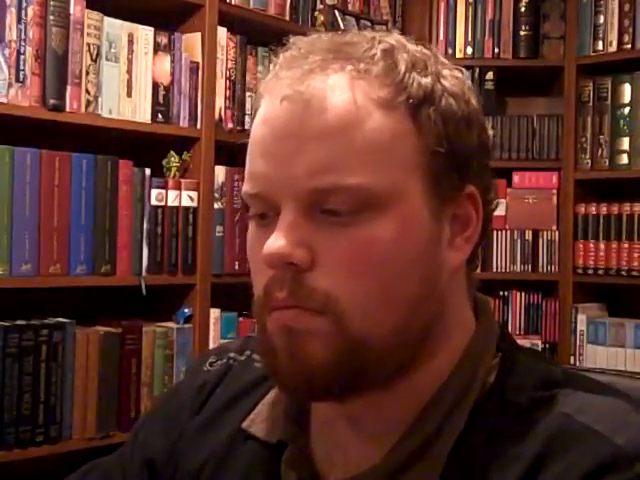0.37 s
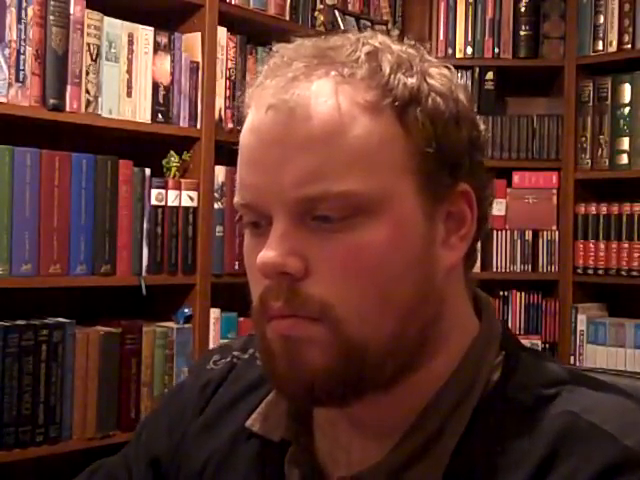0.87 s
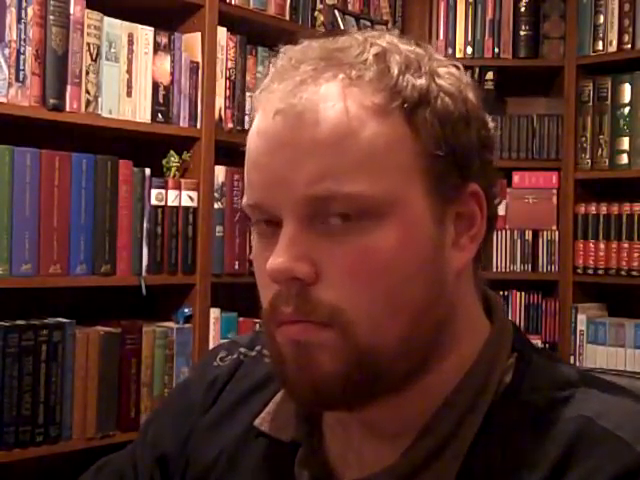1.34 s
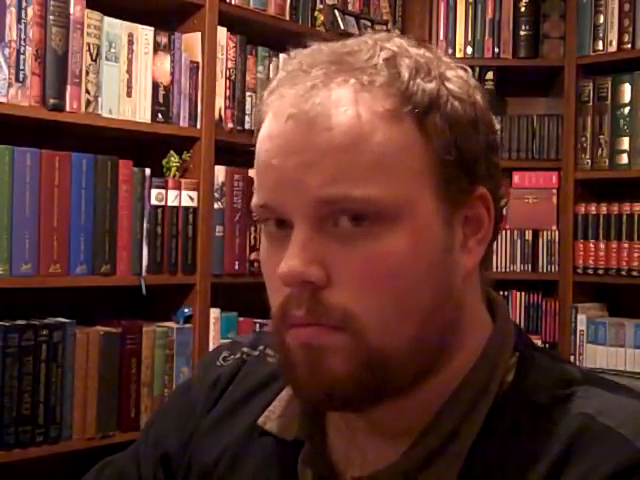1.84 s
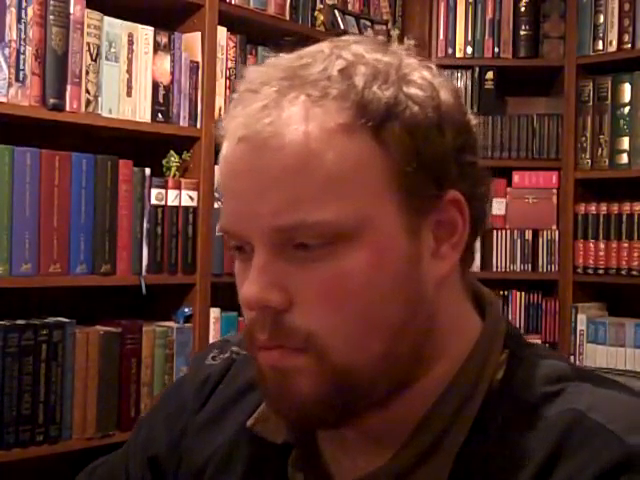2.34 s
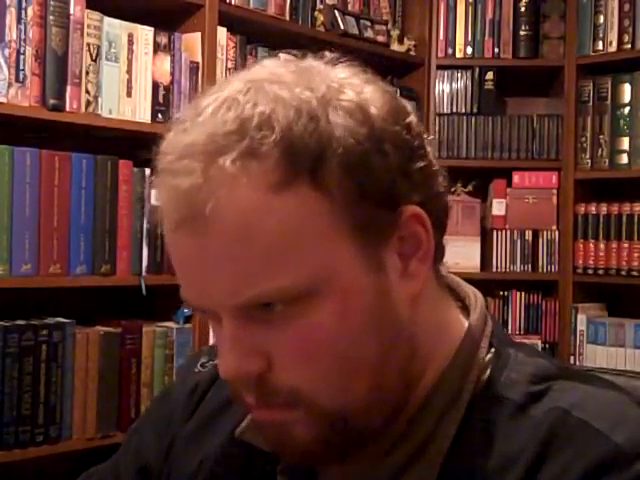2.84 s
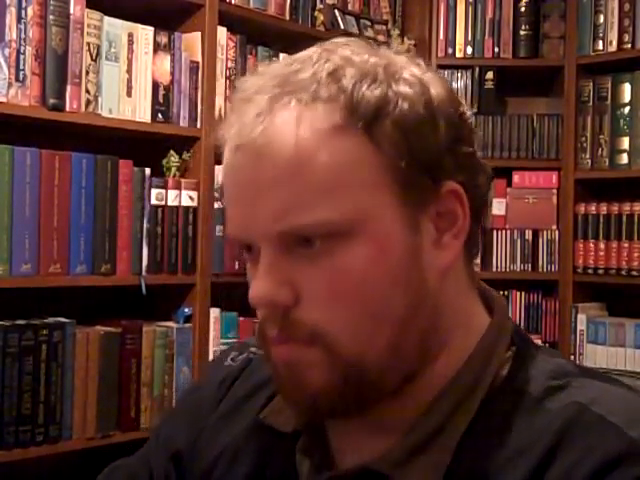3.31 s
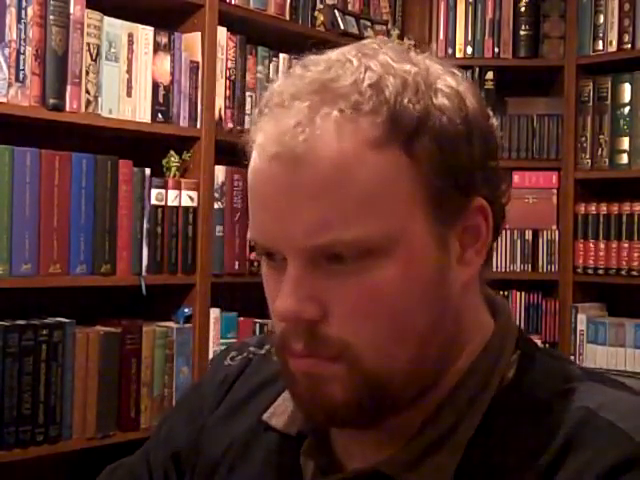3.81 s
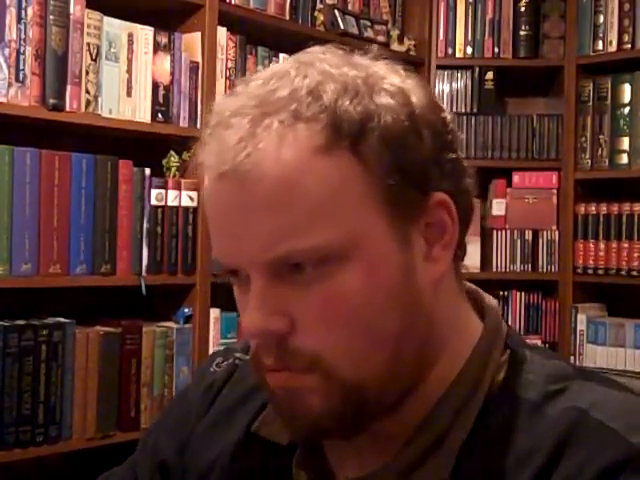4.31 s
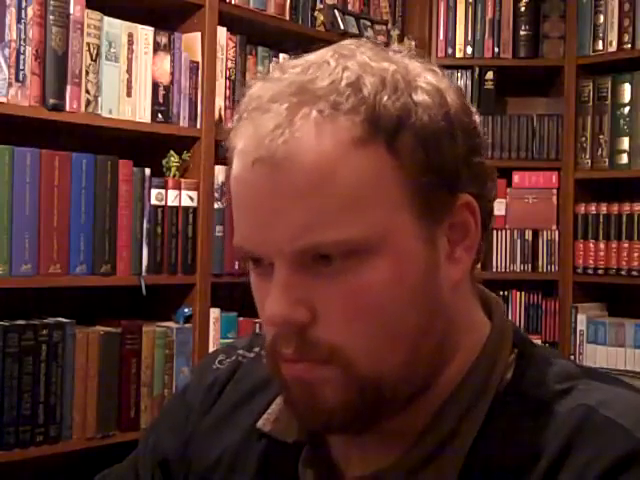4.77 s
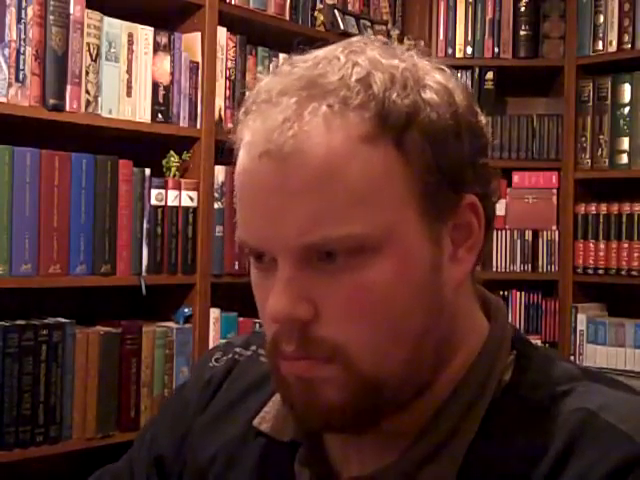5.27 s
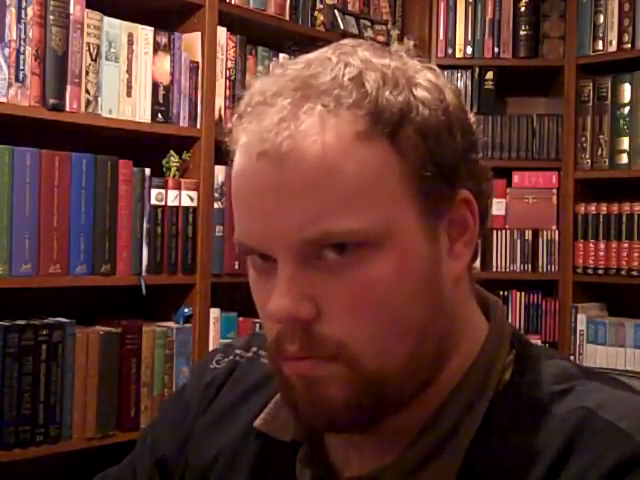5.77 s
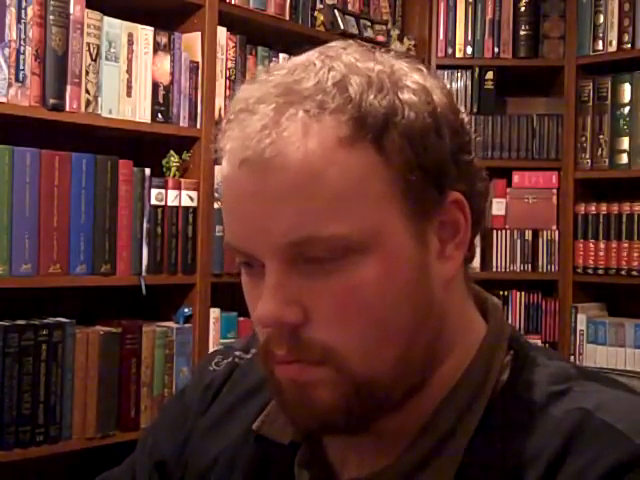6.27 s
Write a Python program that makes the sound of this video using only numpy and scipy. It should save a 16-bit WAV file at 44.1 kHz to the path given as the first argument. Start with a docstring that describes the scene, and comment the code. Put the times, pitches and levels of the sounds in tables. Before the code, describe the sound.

Fast, uneven typing on a plastic computer keyboard, crisp clicks and rattles over soft desk thumps, close up in a quiet book-lined room.

```python
"""Fast, uneven typing on a plastic keyboard in a small room lined with books; a little stereo microphone
lies close by on the same desk. Switches and caps click and rattle in shaped noise bursts.
Keys that bottom out ring modes of the case and the desk; books soak up the echo's treble first.
A quiet hum and hiss lie under it. Each microphone sits behind a small port, a resonant low-pass
that rings in the treble, the left one higher than the right."""
import sys
import numpy as np
from scipy import signal
from scipy.fft import rfft, irfft
from scipy.io import wavfile
from scipy.ndimage import uniform_filter1d

SR = 44100
rng = np.random.default_rng(int(sys.argv[2]) if len(sys.argv) > 2 else 0)


def invert_db(x):
    """Field ratio 10**(x/20) for x, a level in decibels (scalar or array-like)."""
    u = np.asarray(x, float) / 20
    return 10 ** u


def digitize_waveform(pressure):
    """Quantize a signal to 16-bit integers and store it at the path in sys.argv[1].

    Rows of a 2-D input are taken as channels; values are limited to [-1, 1].
    """
    field = np.atleast_2d(pressure).T
    bounded = np.clip(field, -1, 1)
    quanta = np.round(bounded * 32767).astype(np.int16)
    wavfile.write(sys.argv[1], SR, quanta)


N = 292367
TIME = np.arange(N) / SR

# Levels in the event tables are relative; the gains below set the final strength.
# clicks of switch, stem and cap: start_s [s], level_db [dB], cap_tone_db [dB against the click]
KEY_CLICKS = [(0.1598, -22, -13), (0.1957, -21.5, -15), (0.276, -22, -11), (0.2996, -25, -18),
              (0.369, -28, -16), (0.397, -17.5, -10), (0.41, -17.5, -8.5), (0.4936, -17.5, -12.5),
              (0.5599, -21, -11), (0.566, -23.5, -4), (0.5996, -25, -17), (0.743, -14, -14),
              (0.7833, -19.5, -15), (0.855, -36, -6), (0.8726, -17.5, -13), (0.9173, -28, 1),
              (1.054, -23, -10.5), (1.163, -10, -19), (1.186, -14, -12.5), (1.269, -23, -16),
              (1.3194, -19, -17), (1.4634, -18, -17), (1.5392, -17.5, -20), (1.6497, -20.5, -16.5),
              (1.664, -25, -23), (1.7401, -20.5, -11), (1.8859, -18, -27), (1.929, -27.5, -13),
              (2.0096, -26.5, -10), (2.044, -42, -3.5), (2.171, -22, -11), (2.357, -42, 1),
              (2.4029, -16, -16), (2.5444, -20, -11), (2.6166, -27, -5.5), (2.7206, -23.5, -18),
              (2.764, -35, -19), (2.784, -43, 7), (2.8626, -24, -10.5), (2.9054, -19, -6.5),
              (3.026, -35.5, -5), (3.0701, -17.5, -14.5), (3.1996, -23.5, -10), (3.2474, -20.5, -11.5),
              (3.319, -31.5, -6), (3.3399, -13, -14.5), (3.3758, -12.5, -15.5), (3.571, -27, -15),
              (3.6896, -23, -14), (3.7454, -15.5, -14.5), (3.8825, -16.5, -12), (3.904, -17, -28),
              (3.956, -20.5, -14.5), (4.0015, -14, -17.5), (4.092, -12.5, -8), (4.232, -21.5, -12.5),
              (4.2828, -20, -15), (4.316, -16.5, -14.5), (4.4217, -28.5, -4), (4.4759, -16.5, -14),
              (4.5193, -23.5, -12), (4.6167, -18, -17), (4.6437, -23, -11), (4.6912, -14.5, -17.5),
              (4.758, -35.5, 2.5), (4.8022, -16.5, -11), (4.9326, -19.5, -13), (5.0223, -27.5, -13),
              (5.102, -39, -6), (5.1704, -17.5, -10.5), (5.2044, -28, -12), (5.308, -22, -6),
              (5.3268, -12, -11.5), (5.396, -18.5, -5), (5.438, -25.5, -6.5), (5.473, -26, -15),
              (5.5643, -16, -10), (5.6148, -16.5, -10), (5.683, -20, -14), (5.705, -22, -11),
              (5.833, -18, -15), (5.8958, -34, -20), (5.9254, -19.5, -21), (5.9906, -23.5, -16.5),
              (6.3946, -24.5, -12.5), (6.548, -25.5, -13.5), (6.5885, -21, -18)]
# further, thinner clicks with a common weak cap tone, some landing just after another click: start_s [s],
# level_db [dB]
THIN_CLICKS = [(0.0605, -21.5), (0.0767, -19), (0.096, -27), (0.103, -33), (0.331, -32), (0.338, -24.5),
               (0.376, -30), (0.418, -30), (0.5195, -20.5), (0.624, -18), (0.6332, -23), (0.756, -23),
               (0.765, -21), (0.8033, -25), (0.878, -23), (0.9713, -19), (0.9783, -36), (1.021, -33),
               (1.0703, -15), (1.083, -18.5), (1.1354, -18), (1.286, -53), (1.3439, -13), (1.3549, -22),
               (1.4338, -18.5), (1.6078, -24), (1.6266, -16.5), (1.7, -17.5), (1.793, -22.5), (1.8892, -26),
               (1.9524, -18), (2.128, -39), (2.1663, -23.5), (2.19, -25), (2.201, -24.5), (2.214, -46),
               (2.264, -37), (2.2805, -20), (2.3006, -24), (2.3045, -19), (2.395, -15.5), (2.426, -26),
               (2.4302, -15), (2.437, -28), (2.4394, -24.5), (2.599, -17), (2.737, -33), (2.929, -17.5),
               (3.126, -20.5), (3.22, -17), (3.234, -17), (3.2549, -11), (3.2615, -23), (3.269, -40),
               (3.348, -25), (3.37, -35), (3.431, -27.5), (3.4395, -42), (3.532, -22.5), (3.5985, -18.5),
               (3.6576, -16), (3.887, -31), (3.9125, -17), (4.0086, -19), (4.059, -19.5), (4.151, -27),
               (4.2544, -19.5), (4.3206, -29), (4.3509, -18.5), (4.418, -28), (4.492, -23.5), (4.532, -31),
               (4.5646, -17.5), (4.62, -17), (4.7128, -21), (4.7219, -38), (4.8112, -23), (4.9367, -22),
               (4.956, -23), (4.9633, -22), (4.9704, -19), (4.981, -20), (5.233, -19.5), (5.2406, -25),
               (5.3161, -25), (5.4438, -27.5), (5.4772, -25), (5.4902, -15.5), (5.557, -26), (5.572, -26.5),
               (5.609, -23), (5.6227, -45), (5.734, -21.5), (5.743, -19), (5.821, -32), (5.83, -18),
               (5.8796, -34), (6.0196, -19.5), (6.0852, -29), (6.0907, -33.5), (6.1995, -20), (6.239, -30),
               (6.3145, -20), (6.3216, -22.5), (6.4902, -21), (6.5143, -19)]
# wide, loosely guided keys that clatter on after the stroke: start_s [s], level_db [dB]
LOOSE_CLATTERS = [(.301, -89.5), (0.787, -88), (0.853, -92), (1.264, -90), (1.885, -91), (4.419, -90)]
# keys that hit bottom: start_s [s], knock_db [dB], thump_db [dB], pitch_hz [Hz, favoured by the case there]
KEY_BOTTOMS = [(0.093, -48, -58, 720), (0.195, -44.5, -53, 624), (0.407, -40, -43, 610),
               (0.493, -49, -49, 635), (0.564, -52, -68, 824), (0.623, -33.5, -39.5, 555),
               (0.749, -56, -46, 1100), (0.782, -47, -39, 720), (0.912, -62, -45.5, 503),
               (1.016, -39, -43.5, 444), (1.071, -35.5, -43.5, 495), (1.166, -32.5, -38.5, 430),
               (1.348, -42, -38, 690), (1.463, -37.5, -43.5, 505), (1.538, -61, -52, 910),
               (1.631, -50, -42.5, 704), (1.741, -32.5, -44, 464), (1.904, -47, -45.5, 440),
               (2.009, -37, -53, 450), (2.279, -36.5, -44.5, 452), (2.395, -53, -52, 875),
               (2.538, -59, -49, 806), (2.925, -50.5, -44, 760), (3.069, -58, -44.5, 795),
               (3.158, -58, -48.5, 720), (3.256, -30, -44.5, 388), (3.341, -34, -49, 447),
               (3.368, -56, -43.5, 860), (3.498, -48, -47, 452), (3.744, -38.5, -58, 436),
               (3.902, -30.5, -42, 450), (4.002, -25.5, -39, 398), (4.054, -38, -47, 494),
               (4.092, -40, -44.5, 458), (4.286, -38.5, -40.5, 588), (4.476, -41, -51, 452),
               (4.565, -53, -48, 615), (4.62, -42, -46, 506), (4.697, -37, -40, 473),
               (4.802, -38, -43, 470), (4.966, -44, -45, 610), (5.171, -59, -56, 925),
               (5.201, -50, -46.5, 382), (5.309, -36, -43, 450), (5.397, -57, -51, 830),
               (5.487, -40.5, -48.5, 431), (5.563, -34.5, -41.5, 470), (5.611, -37, -41.5, 409),
               (5.666, -55, -44.5, 786), (5.736, -52, -44, 755), (5.829, -53, -43, 447),
               (5.925, -45, -49.5, 483), (6.021, -57, -65, 860), (6.142, -52.5, -56, 610),
               (6.515, -56.5, -62, 850)]
# modes of the desk top: pitch_hz [Hz], level_db [dB], t60_s [s]
DESK_MODES = [(134.5, 3, 0.14), (153.2, 2.5, 0.086), (202.4, -12.5, 0.12), (303.2, -7, 0.093)]
# modes of the keyboard case: pitch_hz [Hz], level_db [dB], t60_s [s]
CASE_MODES = [(464.4, -1, 0.047), (563, 3, 0.037), (639, 2, 0.07), (841, 10.5, 0.08), (1050, 20, 0.04)]
# colour of the hard plastic snap ahead of the microphones: pitch_hz [Hz], level_db [dB]
SNAP_COLOUR = [(600, -3.5), (2500, -11.5), (4500, -3), (6000, -0.5), (10000, -4), (14200, -4.5),
               (16500, -45)]
# colour of the mid-band cap tone ahead of the microphones: pitch_hz [Hz], level_db [dB]
CAP_COLOUR = [(150, -26.5), (500, -6.5), (1500, -11.5), (2300, -2), (3300, -1), (6000, -22)]
# colour of the room air: pitch_hz [Hz], level_db [dB per Hz, relative]
AIR_COLOUR = [(30, -5), (85, 2.5), (135, 7.5), (300, -6.5), (850, -5), (1600, -12), (4000, -20.5),
              (13500, -55)]
# microphone ports, left then right: pitch_hz [Hz], sharpness [Q], level_db [dB], top_hz [Hz, roll-off]
MIC_PORTS = [(7693, 4.25, 0.5, 810000), (6416, 7.8, 0.5, 11570)]

AIR_DB, HUM_DB = -57.5, [-67, -59.5]  # rms ahead of the microphones; hum left, right
HUM_HZ, HUM_WIDTH_HZ = 50.5, 8.4
BRUSH_DB, PREAMP_HISS_DB = -62, -64
LEFT_LAG_S = 0.00002
ROOM_T60_S, ROOM_TREBLE_T60_S, ROOM_DB = 0.24, 0.099, -3.5

SNAP_GAIN_DB, CAP_GAIN_DB = 3, 11
TICK_CAP_DB = -23  # cap tone against a tick, in the place of cap_tone_db
TINT_DB = 3  # rms unevenness of a crack's own resonances
BOUNCE_S, BOUNCE_DB, BOUNCE_SCATTER_DB = 0.0066, -10, 4.5
TWIN_S, TWIN_DB, TWIN_SCATTER_DB = 0.0021, -7, 3.5

# rattle drive at a middling click or thump, and its growth in dB per dB
MID_CLICK_DB, RATTLE_DB, RATTLE_SLOPE = -22, -88, 0.6
MID_THUMP_DB, JOLT_DB, JOLT_SLOPE = -45, -100, 0.81
JOLT_RISE_S, JOLT_FADE_S = 0.012, 0.012

THUMP_GAIN_DB, KNOCK_GAIN_DB = 6, 4.5
THUMP_LAG_S = 0.00602  # the desk answers a moment after the case
KNOCK_FALL_DB = 34  # loss per octave away from the favoured pitch


def colour(x, points):
    """Causal filter with the given (Hz, dB) response, built from the cepstrum of the log gain."""
    hz, db = np.transpose(points)
    bins = np.log(np.fft.rfftfreq(4096, 1 / SR) + 1)
    cepstrum = irfft(np.interp(bins, np.log(hz), db) * np.log(10) / 20)
    # fold onto positive time, which makes the phase minimum
    cepstrum[1:2048] *= 2
    cepstrum[2049:] = 0
    response = irfft(np.exp(rfft(cepstrum)))
    return signal.fftconvolve(x, response[None], axes=1)[:, :x.shape[1]]


def unit(x):
    """Scale to rms 1."""
    return x / np.sqrt(np.mean(x ** 2))


def lay(start_s, rows):
    """Place one short sound per row at its time."""
    x = np.zeros(N + rows.shape[1])
    first = (np.asarray(start_s)[:, None] * SR).astype(int)
    np.add.at(x, first + np.arange(rows.shape[1]), rows)
    return x[:N]


def spikes(start_s, level_db):
    """Impulses of given level at given times."""
    return lay(start_s, invert_db(level_db)[:, None])


def fade(x, tau_s):
    """Each impulse starts an exponential fade."""
    return signal.lfilter([1], [1, -np.exp(-1 / (tau_s * SR))], x)


def pair(count, split_hz):
    """Two noises for left and right, partly alike in the bass and less alike in the treble."""
    mid, side = rng.standard_normal((2, count))
    side = 0.54 * side + signal.lfilter(*signal.butter(1, split_hz, "high", fs=SR), side)
    return mid + np.array([side, -side])


def air():
    """Steady coloured hiss over a wavering mains hum, which is noise through two narrow resonances."""
    peak = signal.iirpeak(HUM_HZ, HUM_HZ / HUM_WIDTH_HZ, fs=SR)
    hum = signal.lfilter(*peak, rng.standard_normal(N))
    hum = signal.lfilter(*peak, hum)
    hiss = unit(colour(pair(N, 4500), AIR_COLOUR))
    return invert_db(AIR_DB) * hiss + invert_db(HUM_DB)[:, None] * unit(hum)


def cracks(start_s, level_db, points, crack_s, tint_db):
    """Each contact is a pair of short noise bursts with its own grain and its own broad resonances."""
    t = TIME[:SR // 50]

    def hump(t):
        return t ** 2 * np.exp(-t / crack_s)

    # the far edge of the cap lands just after the near edge
    twin_db = TWIN_DB + TWIN_SCATTER_DB * rng.standard_normal((len(start_s), 1))
    envelope = hump(t) + invert_db(twin_db) * hump(np.maximum(t - TWIN_S, 0))
    rows = colour(envelope * rng.standard_normal((len(start_s), len(t))), points)
    tint = rng.standard_normal((len(start_s), len(t) // 2 + 1))
    tint = unit(uniform_filter1d(tint, size=40, axis=1))
    rows = irfft(rfft(rows) * invert_db(tint_db * tint), len(t))
    energy = np.sum(rows ** 2, axis=1, keepdims=True)
    return lay(start_s, invert_db(level_db)[:, None] * rows / np.sqrt(energy))


def rattle(start_s, level_db):
    """Loose plastic parts chatter in random taps around clicks, bottoming keys and loose wide keys."""
    bottom_s, _, thump_db, _ = np.transpose(KEY_BOTTOMS)
    taps = rng.random(N) < 280 / SR  # about 280 a second
    taps = taps * invert_db(3.5 * np.minimum(rng.exponential(1, N), 2.8))
    chatter = unit(fade(taps, 0.0006)) + 0.4
    # a faint rustle swells in just before the click and the chatter builds while the cap settles
    shake = spikes(start_s - 0.003, RATTLE_DB + RATTLE_SLOPE * (level_db - MID_CLICK_DB))
    # loose keys are shaken by a blow, following its thump level
    jolt = spikes(bottom_s, JOLT_DB + JOLT_SLOPE * (thump_db - MID_THUMP_DB))
    jolt = jolt + spikes(*np.transpose(LOOSE_CLATTERS))
    swell = fade(fade(shake, 0.0025), 0.014) + fade(fade(jolt, JOLT_RISE_S), JOLT_FADE_S)
    return chatter * swell


def clicks():
    """Hard plastic cracks, loose parts chattering around them, and fingertips brushing the caps."""
    ticks = [row + (TICK_CAP_DB,) for row in THIN_CLICKS]
    start_s, level_db, cap_tone_db = np.transpose(KEY_CLICKS + ticks)
    loose = rattle(start_s, level_db) + invert_db(BRUSH_DB)
    snap_db = level_db + SNAP_GAIN_DB
    cap_db = level_db + cap_tone_db + CAP_GAIN_DB

    snap = cracks(start_s, snap_db, SNAP_COLOUR, 0.00042, TINT_DB)
    snap = snap + colour(loose * rng.standard_normal((1, N)), SNAP_COLOUR)[0]
    cap = cracks(start_s, cap_db, CAP_COLOUR, 0.0004, TINT_DB)
    cap = cap + invert_db(-4) * colour(loose * rng.standard_normal((1, N)), CAP_COLOUR)[0]

    # every click is answered by a softer one, usually weaker
    bounce_s = start_s + BOUNCE_S * (1 + 0.13 * rng.standard_normal(len(start_s)))
    bounce_db = snap_db + BOUNCE_DB + BOUNCE_SCATTER_DB * rng.standard_normal(len(start_s))
    bounce = cracks(bounce_s, bounce_db, SNAP_COLOUR, 0.00083, TINT_DB)

    # the top treble leaves the caps unevenly and differs at the two microphones
    apart = cracks(start_s, level_db + 11.5, SNAP_COLOUR, 0.00025, 0.35)
    apart = signal.lfilter(*signal.butter(2, 11000, "high", fs=SR), apart)
    return snap + cap + bounce, np.array([apart, -apart])


def room(x, count=5):
    """Desk, screen and shelves answer after a few ms by changing echo paths; books take the treble first."""
    t, out = TIME[:SR // 2], 0
    # one of the paths is drawn every 2048 samples
    place = np.repeat(rng.integers(0, count, N // 2048 + 1), 2048)[:N]
    for k in range(count):
        noise = pair(len(t), 9000)
        low = signal.lfilter(*signal.butter(1, 1500, fs=SR), noise)
        treble = noise - low
        tail = low * invert_db(-60 * t / ROOM_T60_S) + treble * invert_db(-60 * t / ROOM_TREBLE_T60_S)
        tail = tail * np.clip(t / 0.0047, 0, 1) ** 2
        tail = tail / np.sqrt(np.sum(tail[0] ** 2))
        share = fade(1.0 * (place == k), 0.004) / (0.004 * SR)  # smooth change of path
        out = out + signal.fftconvolve((x * share)[None], tail, axes=1)[:, :N]
    return invert_db(ROOM_DB) * out


def ring(start_s, level_db, modes, push_s, scatter_db, detune, tilt_db=0):
    """Soft blows ring the modes; each lands elsewhere, so it wakes and loads them a little differently."""
    hz, mode_db, t60_s = np.array(modes).T[:, None, :, None]
    size, shift = rng.standard_normal((2, len(start_s), len(modes), 1))
    t = TIME[:SR // 5]
    envelope = invert_db(mode_db + tilt_db + scatter_db * size - 60 * t / t60_s)
    rows = envelope * np.sin(2 * np.pi * hz * (1 + detune * shift) * t)
    push = 1 - np.exp(-t / push_s)
    return lay(start_s, invert_db(level_db)[:, None] * rows.sum(axis=1) * push)


def bottoms():
    """The finger's push thumps the desk; the harder stem contact knocks the case, mostly near one pitch."""
    start_s, knock_db, thump_db, pitch_hz = np.transpose(KEY_BOTTOMS)
    octaves = np.abs(np.log2(np.array(CASE_MODES)[:, 0] / pitch_hz[:, None]))
    near_db = -KNOCK_FALL_DB * octaves[:, :, None]
    thump = ring(start_s + THUMP_LAG_S, thump_db + THUMP_GAIN_DB, DESK_MODES, 0.0073, 0.98, 0.034)
    knock = ring(start_s, knock_db + KNOCK_GAIN_DB, CASE_MODES, 0.0029, 0.93, 0.023, near_db)
    # a desk this size radiates little below its first mode
    high_pass = signal.butter(4, 95, "high", fs=SR, output="sos")
    return signal.sosfilt(high_pass, thump + knock)


def scene():
    """Keys, their echo and the quiet room; the desk carries the thumps a little more to the right."""
    ticks, apart = clicks()
    thumps = bottoms()
    direct = ticks + apart + thumps * invert_db(np.array([[-1.5], [0]]))
    return direct + room(ticks + 0.43 * thumps) + air()


def band_limit(x):
    """A steep low-pass at the top of the band."""
    return signal.sosfilt(signal.butter(12, 16650, fs=SR, output="sos"), x)


def record(dry):
    """Each port is a resonant low-pass that also turns left's phase against right; preamplifiers hiss."""
    f = np.fft.rfftfreq(N, 1 / SR)
    ports = []
    for pitch_hz, sharpness, level_db, top_hz in MIC_PORTS:
        resonance = invert_db(level_db) / (1 - (f / pitch_hz) ** 2 + 1j * f / pitch_hz / sharpness)
        ports.append(resonance / (1 + 1j * f / top_hz) ** 3)
    ports = np.array(ports)
    ports[0] *= np.exp(-2j * np.pi * f * LEFT_LAG_S)
    band = signal.butter(8, [3000, 13800], "band", fs=SR, output="sos")
    hiss = invert_db(PREAMP_HISS_DB) * signal.sosfilt(band, rng.standard_normal(dry.shape))
    mix = irfft(rfft(dry) * ports, N) + hiss
    return band_limit(mix)


dry = scene()
out = record(dry)
digitize_waveform(out)
```